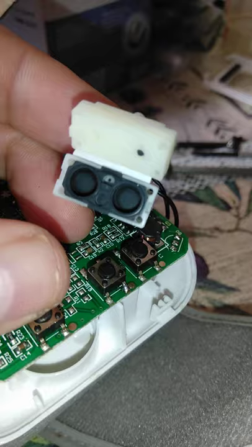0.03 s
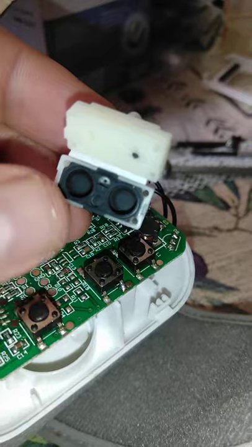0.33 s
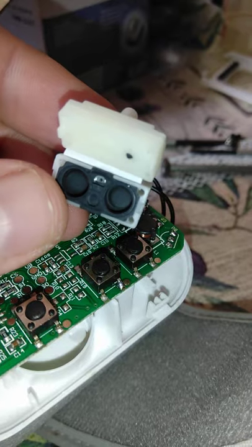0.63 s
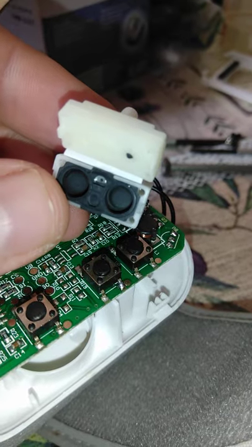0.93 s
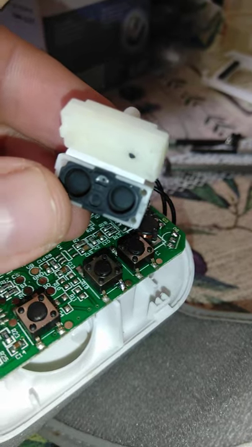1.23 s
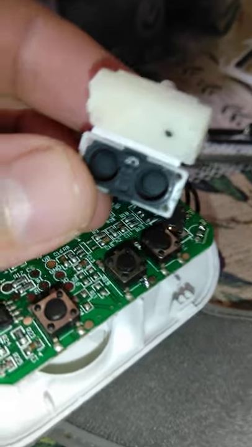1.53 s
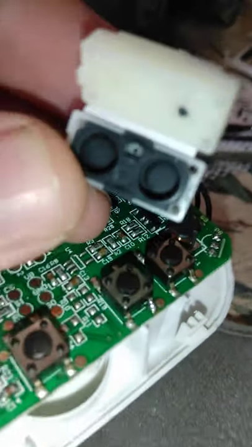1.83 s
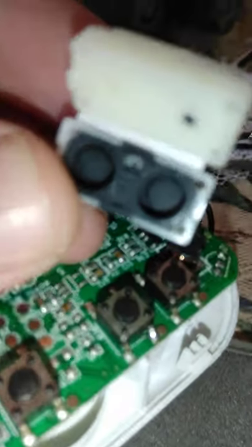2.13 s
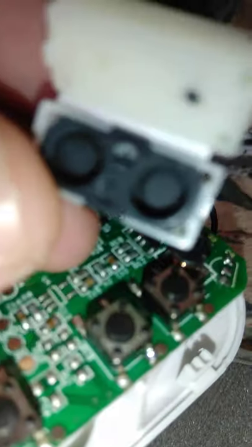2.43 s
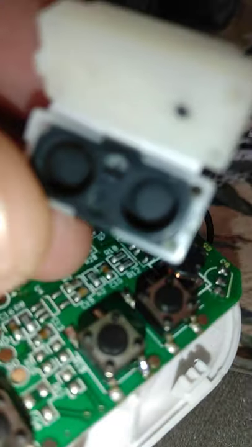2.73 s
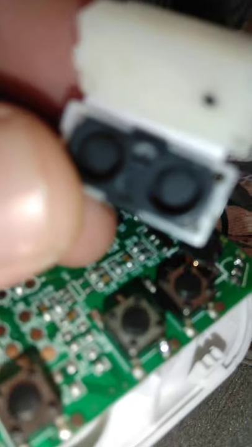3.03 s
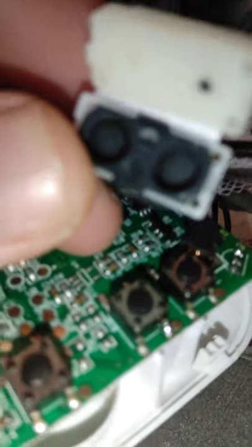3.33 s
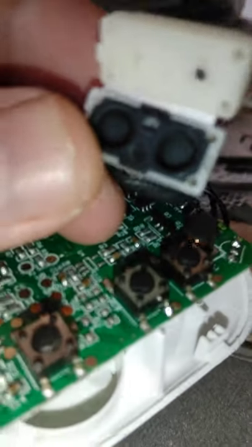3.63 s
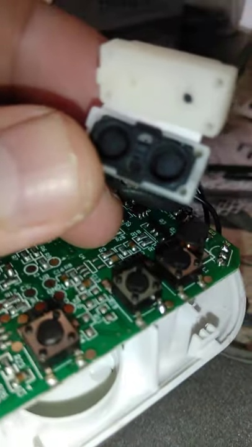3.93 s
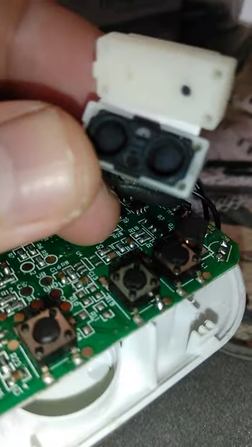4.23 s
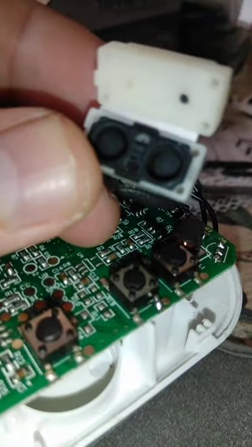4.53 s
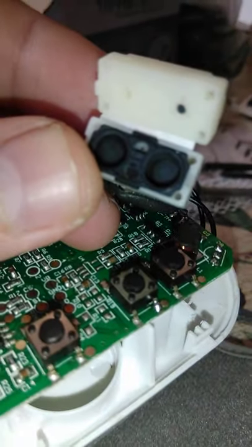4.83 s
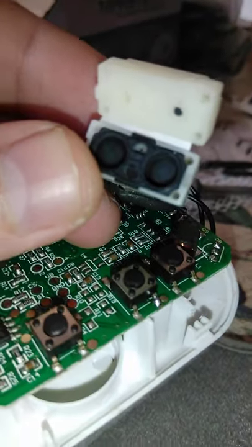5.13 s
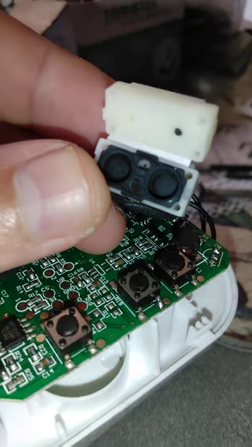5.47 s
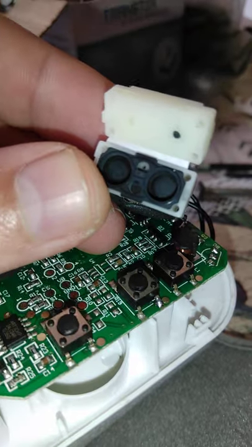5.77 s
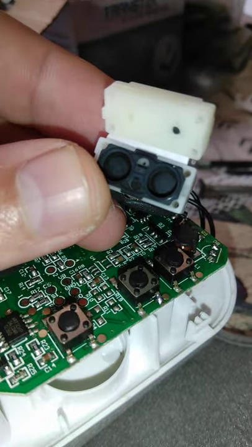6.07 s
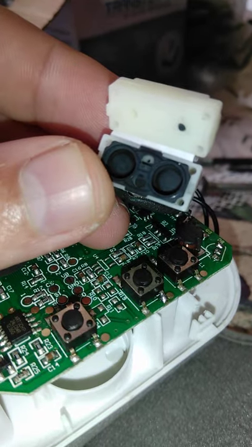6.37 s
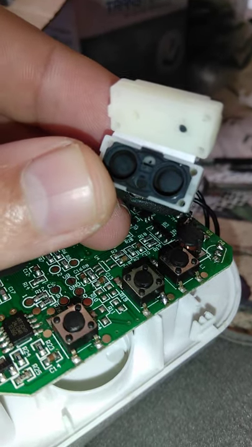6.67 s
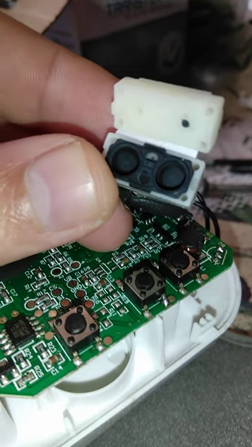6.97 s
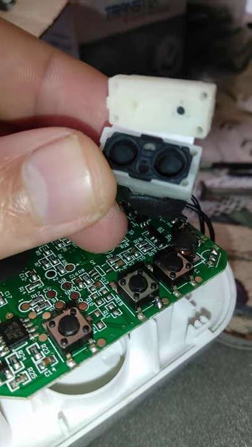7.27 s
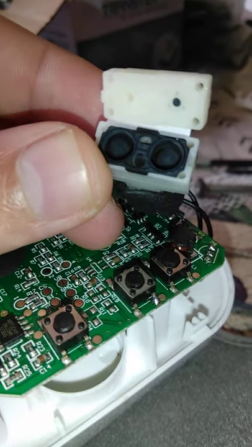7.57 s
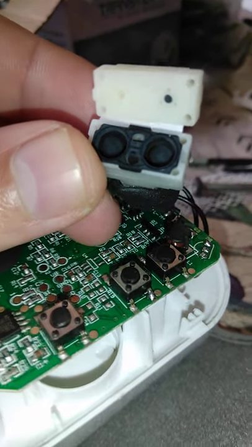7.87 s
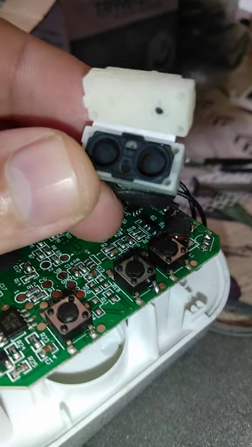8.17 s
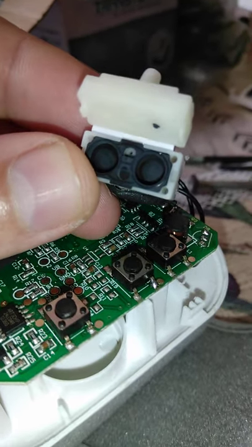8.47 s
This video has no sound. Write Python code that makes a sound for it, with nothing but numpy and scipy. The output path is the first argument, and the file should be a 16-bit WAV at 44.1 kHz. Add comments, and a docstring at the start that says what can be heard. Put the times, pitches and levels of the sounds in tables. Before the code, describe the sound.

Close up, a small air pump motor runs with a fast, raspy popping buzz and thin whirr, broken by shrill surges.

```python
"""Tiny air pump, close up

An opened pump, held in the fingers right by a two-port microphone in a quiet room. Its motor rattles
along freely, then knocks as it takes up load and drops to about half speed. From then on a rubber cup
throbs and pops once a turn over the whirr of the drive; now and then it tightens, loud and shrill."""
import sys
import numpy as np
from scipy import signal
from scipy.fft import rfft, irfft, next_fast_len
from scipy.io import wavfile
from scipy.ndimage import map_coordinates

SR = 44100
rng = np.random.default_rng(int(sys.argv[2]) if len(sys.argv) > 2 else 0)


def to_wav(sig):
    """Store sig (one row per channel, or 1-D mono) as 16-bit WAV at the path in sys.argv[1].

    Samples outside -1..1 are clipped; the rate is SR.
    """
    pcm = np.clip(np.atleast_2d(sig), -1, 1) * 32767
    pcm = np.round(pcm).astype(np.int16)
    wavfile.write(sys.argv[1], SR, pcm.T)  # frames by channels


N = 379260
TIME = np.arange(N) / SR
FREE_HZ, LOADED_HZ, CRUISE_HZ = 198, 99.5, 114.5  # shaft speeds, turns a second
LOAD_AT_S, CATCH_AT_S = .185, .553  # the load comes on; the cup catches and starts to pop
LEFT_LAG_MS = 0.25  # the left port is the farther one

# Colour of one pop. Each row: frequency in Hz, slack level in dB, tight level in dB.
POP_COLOUR = [(750, -4.5, -27), (890, -12, -27), (1220, -9.5, -15), (1410, -8.5, -13), (1656, -1, -27.5),
              (2300, 2, -2), (2550, 0.5, -7.5), (2880, 6.5, -17), (3258, 6.5, -4.5), (3750, -7, 9),
              (4150, -7.5, 5.5), (4610, -5, 17.5), (5320, -1.5, 10.5), (5850, -9.5, -6.5), (6430, -4.5, -1),
              (8230, -12.5, -10.5), (12800, -33.5, -28)]
# Strength of the pops. Each row: time in seconds, gain in dB.
POP_LEVEL = [(.6, 0.5), (1.0, 0), (1.8, 1.2), (2.3, 5), (2.95, 6), (3.8, 3), (4.5, 3), (5.2, 3), (5.6, 1.2),
             (7.2, 1.5), (8.6, 1.5)]
# A pinched cup rings in one narrow band, a thin rasp above it. Each row: frequency in Hz, gain in dB.
PINCH_COLOUR = [(2800, -1.5), (3400, -4.5), (3900, 15), (4500, -3.5), (5500, -9), (6900, 9.5), (7400, 4),
                (8100, -3)]
# The cup tightens and slackens. Each row: start and length in seconds, peak tautness and pinch, 0-1.
TIGHTENINGS = [(0.519, 0.11, 0.78, 0), (3.302, 0.081, .16, 0.6), (4.517, 0.15, 0.39, .8),
               (4.651, 0.14, 0.57, 1), (4.798, 0.068, 0.19, .8), (4.981, 0.19, 0.53, 0.79),
               (5.618, .12, 0.27, 0.3), (5.673, 0.25, 0.69, 0.2), (5.732, .15, .95, 0),
               (5.846, 0.0953, .5, 0.2), (7.28, .172, 0.84, 0.17), (7.403, .31, 0.48, .2),
               (7.523, 0.17, 0.6, 0.43), (7.668, 0.27, 0.74, 0.33)]
# Throb of the cup. Each row: multiple of the shaft speed, levels in dB before the catch, in the first
# grip and in the second, then dB added when close, when tight and at the left port.
THROB_ORDERS = [(3, -62.5, -68, -76, 7.5, 13, -20), (4, -68.5, -59.5, -57.5, 5.5, -7.5, -12),
                (5, -63, -54.5, -57, 4.5, -17, -22), (6, -66, -59, -55, 6, -1, -3.5),
                (7, -77, -57, -55, 4.5, -13.5, -1.5), (8, -66, -62, -65.5, 0, -17, -5.5)]
# Slow wander of the motor. Each row: time in seconds, speed offset in turns a second.
SPEED_WANDER = [(.5, .41), (.62, .36), (.8, -.97), (1.4, -.88), (2, -.83), (2.5, .33), (3, .12),
                (3.4, -.39), (4.2, -.12), (4.7, -.73), (5.1, -.01), (5.4, .38), (5.8, -1.08), (6.1, -.14),
                (6.5, .54), (7.2, -.31), (7.5, -.53), (7.8, -.44), (8.1, .32), (8.6, -.38)]
# Knock of the crank. Each row: frequency in Hz, level in dB.
KNOCK_COLOUR = [(700, -10), (1500, -10.5), (3000, -5), (5500, -15), (9000, -26), (15000, -26)]
# Scrape of the return stroke. Each row: frequency in Hz, level in dB.
SCRAPE_COLOUR = [(1500, -51.5), (3000, -33), (4500, -35), (6000, -26), (8000, -35), (10000, -37.5),
                 (14000, -56)]
# Whirr of the motor. Each row: frequency in Hz, left and right levels in dB.
WHIRR_COLOUR = [(212, -62, -48.5), (467, -45.5, -50), (1300, -59.5, -52), (1800, -48, -34),
                (2500, -76, -33.5), (2900, -30.5, -34.5), (3980, -40.5, -47.5), (4900, -31.5, -30.5),
                (6300, -37.5, -36.5), (7700, -36.5, -39), (8400, -40.5, -38.5), (10140, -41, -44),
                (14500, -60, -51.5), (16200, -57, -44)]
# Rattle of the loose drive. Each row: frequency in Hz, left and right levels in dB.
RATTLE_COLOUR = [(400, -60, -41), (1130, -35, -36.5), (2110, -34, -20), (2700, -29.5, -30),
                 (3730, -35, -19.5), (5250, -25, -12.5), (5850, -37, -17.5), (6700, -16.5, -23),
                 (7730, -38, -20), (8500, -27.5, -31.5), (10100, -32, -27), (13900, -32, -30),
                 (15700, -33, -48)]
# Tones of the free-running motor. Each row: multiple of the shaft speed, relative level in dB.
FREE_TONES = [(1, -41), (2, -48.5), (3, -42.5), (4, -47), (5, -62), (6, -57), (7, -54), (8, -56), (9, -47)]
# Hum as the grip changes. Each row: time in seconds, first and second order levels in dB.
HUM_LEVELS = [(0.28, -50, -70), (0.44, -57, -67), (0.55, -50.5, -64), (0.82, -50.5, -60),
              (1.34, -52.5, -59), (1.8, -56.5, -75), (2.4, -52.5, -63), (3, -50.5, -67), (4.05, -59, -72),
              (4.4, -60, -72), (4.69, -55, -60.5), (5.4, -60.5, -72.5), (5.83, -54.5, -61),
              (6.17, -59, -73), (6.6, -57.5, -61), (7.2, -56.5, -62), (7.6, -55.5, -58), (8.5, -57, -58)]
# Soft bumps. Each row: start in seconds, relative level in dB, band frequency in Hz, decay in seconds.
BUMPS = [(0.182, -45, 210, 0.021), (.185, -55, 480, 0.11), (1.784, -59, 270.4, 0.041),
         (1.913, -50.5, 330, 0.041), (3.353, -62, 55, 0.062), (3.919, -58, 55, 0.064),
         (4.479, -61, 90, 0.14), (4.695, -61, 230.3, 0.049), (4.801, -59, 89.85, .06)]
# How near the pump is held to the right port. Each row: time in seconds, closeness 0-1.
CLOSENESS = [(0, 0), (1.4, 0), (2, 0.5), (2.5, 0.64), (3, 1), (3.5, 0.44), (4, 0.28), (4.6, 0.17),
             (5.6, 0.07), (6.3, 0.14), (8.6, 0.08)]
# Hollow between hand and microphone. Each row: time in seconds, swallowed band in Hz, its depth 0-1,
# lifted band in Hz, its lift 0-1.
HAND_HOLLOW = [(0.6, 5200, 0.12, 6150, 0.15), (0.8, 4870, 0.4, 6300, 0.33), (1.5, 4600, 0.44, 6540, 0.3),
               (2.0, 5070, 0.66, 6800, 0.66), (2.6, 5500, 0.75, 7900, 1), (3.1, 5400, 0.68, 7600, 0.65),
               (3.5, 5000, 0.4, 7060, 0.48), (4.05, 4650, 0.72, 7000, 0.41), (5.1, 4500, 0.36, 6950, 0.28),
               (5.7, 5430, 0.08, 7573, .15), (6.4, 6100, 0.1, 7900, 0.17), (7.4, 5420, 0.33, 7700, 0.18),
               (8.6, 5120, 0.4, 7495, 0.35)]
# Echoes off the circuit board and the hand. Each row: delay in milliseconds, left gain, right gain.
CLOSE_ECHOES = [(0.272, 0.044, 0.0087), (0.503, 0.019, 0.12), (0.851, 0.059, 0.06), (1.6, 0.017, 0.023),
                (2.3, 0.056, 0.029)]
# The body housing the microphone shades the left port. Each row: frequency in Hz, gain in dB.
LEFT_SHADOW = [(100, -28), (400, -15), (1100, 0.5), (1600, -17.5), (2400, -3), (3400, -13.5), (4500, -7.5),
               (6000, -22), (8000, -14.5), (13000, -3)]
# Room tone. Each row: frequency in Hz, level in dB.
ROOM_COLOUR = [(20, -43), (50, -47), (75, -41), (130, -49), (250, -49), (500, -59), (1500, -45.5),
               (15000, -49)]


def cup_pops(turns, tautness, pinch, tight_db=3, stretch=0.12, puff_s=0.0019, rasp=0.8):
    """One pop a turn with a puff of air: the tighter the cup, the louder, higher and rougher it rings."""
    times = passing_times(turns, angle=.812)
    times = times[times > CATCH_AT_S]
    quiver = 1 + 0.059 * waver(6.8, 30.1)
    taut = np.interp(times, TIME, tautness * quiver)[:, None]
    db = curve(POP_LEVEL, times).T + tight_db * (1 - (1 - taut) ** 2)  # levels off near fully tight
    taut = 0.094 + 0.906 * taut  # even a slack cup keeps some tension
    uneven, flicker = rng.standard_normal((len(times), 2)).T[:, :, None]
    hz = np.fft.rfftfreq(512, 1 / SR)
    treble = np.interp(hz, [4500, 9000], [0, 1])
    slack, tight = colour(POP_COLOUR, size=512)
    tight = np.interp(hz / (1 + stretch * (taut - 1)), hz, tight)  # resonances climb with tension
    shape_db = slack + taut * (tight - slack + .8 * flicker * treble)
    shape_db += np.interp(times, TIME, pinch)[:, None] * colour(PINCH_COLOUR, size=512)
    # the escaping air is a short burst of noise through the same resonances
    fade = np.exp(-np.arange(512) / SR / puff_s)
    air = rfft(rng.standard_normal((len(times), 512)) * fade / np.linalg.norm(fade))
    puff = .215 - .045 * taut + rasp * taut * treble
    spectra = click_spectrum(shape_db + db + .4 * uneven) * (1 + puff * air)
    return place_clicks(times, spectra) * ramp(CATCH_AT_S, 0.015)


def cup_throb(turns, taut, close, angle=0.2198, sweep=0.0613, dip_db=-7.5):
    """The cup pushes air once a turn, a soft upward chirp; tension favours the third and sixth orders."""
    regripped = ramp(3.1, 0.41)  # the fingers shift their grip
    dip = ramp(7.27, 0.022) - ramp(7.9, 0.022)  # through the last run of tightenings
    push = 0
    for order, idle_db, first_db, second_db, close_db, tight_db, left_db in THROB_ORDERS:
        grip_db = first_db + regripped * (second_db - first_db)
        working_db = grip_db + close_db * close + tight_db * np.sqrt(taut) + dip_db * dip
        db = idle_db + ramp(CATCH_AT_S, 0.091) * (working_db - idle_db)
        db += 0.9 * waver(0.96, 12, count=8)
        tone = np.sqrt(2) * np.cos(2 * np.pi * (order * (turns - angle) - sweep * order ** 2))
        push += tone * gain_of(db) * gain_of([[left_db], [0]])
    return push * ramp(LOAD_AT_S, 0.091)


def cup_tension(tighten_s=.052, slacken_share=.42):
    """How tight the cup is, from 0 (slack) to 1, and how much of that is a pinch."""
    start, length, peak, pinch = np.transpose(TIGHTENINGS)[:, :, None]
    rising = (TIME - start) / tighten_s
    falling = (start + length - TIME) / (slacken_share * length)
    swells = peak * np.sin(np.pi / 2 * np.clip(np.minimum(rising, falling), 0, 1))
    return swells.max(0), (swells * pinch).max(0)


def shaft_speed(taut, brake_s=.049, pickup_at_s=.47, pickup_s=.1824, sag_hz=3.39, inertia_s=.02):
    """The motor is braked by its load, picks up to a cruise, and sags whenever the cup tightens."""
    braking = (FREE_HZ - LOADED_HZ) * np.exp(-(since(LOAD_AT_S) / brake_s) ** 1.3)
    pickup = (CRUISE_HZ - LOADED_HZ) * (1 - np.exp(-since(pickup_at_s) / pickup_s))
    lag = np.exp(-1 / (inertia_s * SR))
    sag = sag_hz * signal.lfilter([1 - lag], [1, -lag], taut ** 2)
    flutter = 0.089 * waver(6, 39.8)
    return LOADED_HZ + braking + pickup - sag + curve(SPEED_WANDER)[0] + flutter


def crank_knocks(turns, fade_db_per_s=32):
    """Taking up load, the crank knocks once a turn in its play, ever softer until the cup catches."""
    times = passing_times(turns, angle=.8)
    times = times[(times > LOAD_AT_S) & (times < CATCH_AT_S)]
    db = colour(KNOCK_COLOUR, size=512) - fade_db_per_s * (times[:, None] - LOAD_AT_S)
    return place_clicks(times, click_spectrum(db))


def crank_scrape(turns, taut, close):
    """The working crank scrapes for a millisecond on the return stroke, and more faintly just before."""
    gate = unit_rms(swell(turns, angle=0.384, width=0.072) + 0.28 * swell(turns, angle=0.06, width=0.014))
    rubbing = gate * contacts(turns, repeat_share=.76, spiky_db=3.5, wear_s=0.709) * (TIME > CATCH_AT_S)
    return ring(rubbing, SCRAPE_COLOUR)[0] * gain_of(-5 + 2.5 * close ** 2 + 3 * taut)


def motor_whirr(turns, speed, taut, close, octave_db=12, idle_db=-9):
    """Brushes and bearings rub much alike on every turn, louder with speed and once the cup has caught."""
    rubbing = [contacts(turns, repeat_share=.72, spiky_db=5.5, wear_s=0.584) for _ in range(3)]
    db = octave_db * np.log2(speed / CRUISE_HZ) + idle_db * (TIME < CATCH_AT_S)
    db += 3.5 * close - 1.5 * taut + waver(2, 12)
    return ring(at_ports(*rubbing, shared=0.39), WHIRR_COLOUR) * gain_of(db)


def drive_rattle(turns, speed, level_db=-4, octave_db=13.5, damp_db_per_s=120, fade_db_per_s=150):
    """The loose drive chatters twice a turn until the cup catches, and sings until the load damps it."""
    rubbing = [contacts(turns, repeat_share=0.21, spiky_db=4, wear_s=0.33, count=105) for _ in range(3)]
    surge = unit_rms(gain_of(2 * (np.cos(2 * np.pi * turns) + np.cos(4 * np.pi * turns))))
    chatter = ring(surge * at_ports(*rubbing, shared=0.81), RATTLE_COLOUR)
    chatter_db = level_db + octave_db * np.log2(speed / FREE_HZ) - fade_db_per_s * since(CATCH_AT_S)
    tones = sum(gain_of(db) * np.sin(2 * np.pi * (k * turns + rng.random())) for k, db in FREE_TONES)
    tones *= gain_of(level_db - damp_db_per_s * since(LOAD_AT_S))
    return chatter * gain_of(chatter_db) + tones * gain_of([[-8], [0]])


def contacts(turns, repeat_share, spiky_db, wear_s, count=135, size=8192):
    """Rubbing contacts round the shaft: a slowly changing pattern that repeats each turn, plus grit."""
    patterns = irfft(np.exp(2j * np.pi * rng.random((20, count))), size)
    age, blend = np.divmod(TIME / wear_s + rng.random(), 1)
    angle = (turns % 1 * size).astype(int)
    old, new = (patterns[(age.astype(int) + k) % 20, angle] for k in range(2))
    repeating = old * np.cos(blend * np.pi / 2) + new * np.sin(blend * np.pi / 2)
    grit = rng.standard_normal(N) * gain_of(spiky_db * np.minimum(rng.exponential(1, N), 5))
    return np.sqrt(repeat_share) * unit_rms(repeating) + np.sqrt(1 - repeat_share) * unit_rms(grit)


def housing_hum(turns):
    """The unbalanced crank shakes the housing under load, at the shaft speed and at twice that."""
    shake = 0
    for order, db, left_db in zip((1, 2), curve(HUM_LEVELS), (-15.5, -3)):
        tone = np.sqrt(2) * np.sin(2 * np.pi * (order * turns + rng.random()))
        shake += tone * gain_of(db + 1.14 * waver(0.894, 13, count=8)) * gain_of([[left_db], [0]])
    return shake * ramp(LOAD_AT_S, 0.1)


def handling_bumps():
    """The fingers, and the drive taking load, set off dull, quickly dying rumbles in the housing."""
    bumps = np.zeros(N)
    for start, db, hz, decay_s in BUMPS:
        age = since(start) / decay_s
        rumble = unit_rms(filtered(rng.standard_normal(N), "band", [hz / 2, hz * 1.37]))
        bumps += gain_of(db) * rumble * np.minimum(age * 10, 1) * np.exp(-age ** 2)
    return bumps * gain_of([[-3], [2]])


def near_field(clicks):
    """Clicks reach the microphone directly and by close echoes, late and shaded at the left port."""
    size = next_fast_len(N + 1000)
    phase_per_ms = -2j * np.pi * np.fft.rfftfreq(size, 1 / SR) / 1000
    paths = 1 + sum(np.outer(gains, np.exp(phase_per_ms * ms)) for ms, *gains in CLOSE_ECHOES)
    paths[0] *= np.exp(phase_per_ms * LEFT_LAG_MS)
    left, right = irfft(rfft(clicks, size) * paths, size)[:, :N]
    return np.array([ring(left, LEFT_SHADOW)[0], right])


def hand_sway(ports, sway_ms=0.012):
    """The unsteady hand slowly changes the path to the left port."""
    positions = np.arange(N) + waver(0.27, 1.347, count=10) * sway_ms * SR / 1000
    return np.array([map_coordinates(ports[0], [positions], order=3), ports[1]])


def hand_hollow(ports, dip_width_hz=900, lift_width_hz=1300):
    """The gap under the moving hand swallows one gliding band and, on the right, lifts a higher one."""
    dip_hz, depth, lift_hz, lift = curve(HAND_HOLLOW)
    left, right = (port - depth * resonate(port, dip_hz * ratio, dip_width_hz * ratio)
                   for port, ratio in zip(ports, (0.99, 1)))
    return np.array([left, right + lift * resonate(right, lift_hz, lift_width_hz)])


def close_up(ports, close, left_db=-1.5):
    """Brought closer, the pump turns airier and favours the right port; the hand's hollow colours it."""
    air = 0.65 * close * filtered(ports, "band", [9000, 12500])
    return hand_hollow(ports + air) * gain_of(close * np.array([[left_db], [0]]))


def reflections(clicks, wet_db=-20, t60_s=0.052, size=8192):
    """The desk and walls return a faint, short wash, different at each port."""
    t = np.arange(size) / SR
    tail = rng.standard_normal((2, size)) * gain_of(-60 * t / t60_s) * (t > .002)
    tail /= np.linalg.norm(tail[0])
    return gain_of(wet_db) * signal.oaconvolve(clicks[None], tail, axes=1)[:, :N]


def room_tone():
    """Faint rumble and hiss, mostly shared by both ports."""
    return ring(at_ports(*rng.standard_normal((3, N)), shared=.8), ROOM_COLOUR)


def at_ports(common, left, right, shared):
    """A common sound reaches the left port late; each port also hears a share of its own."""
    late = np.interp(TIME - LEFT_LAG_MS / 1000, TIME, common)
    return np.sqrt(shared) * np.array([late, common]) + np.sqrt(1 - shared) * np.array([left, right])


def gain_of(db):
    return 10 ** (np.asarray(db) / 20)


def unit_rms(x):
    return x / np.sqrt(np.mean(x ** 2) + 1e-20)


def since(start_s):
    return np.maximum(TIME - start_s, 0)


def ramp(start_s, rise_s):
    return np.minimum(since(start_s) / rise_s, 1)


def filtered(x, kind, hz, order=2):
    return signal.sosfilt(signal.butter(order, hz, kind, fs=SR, output="sos"), x)


def waver(low_hz, high_hz, count=16):
    """A slow random wavering of rms 1."""
    rates = np.geomspace(low_hz, high_hz, count)
    return unit_rms(sum(np.sin(2 * np.pi * (hz * TIME + rng.random())) / np.sqrt(hz) for hz in rates))


def curve(rows, t=TIME):
    """Every value column of a table at the times t."""
    seconds, *columns = np.transpose(rows)
    return np.array([np.interp(t, seconds, column) for column in columns])


def colour(rows, size):
    """Every dB column of a spectrum on the bins of an FFT."""
    hz, *columns = np.transpose(rows)
    bins = np.fft.rfftfreq(size, 1 / SR)
    return np.array([np.interp(np.log(bins + 1), np.log(hz), column) for column in columns])


def click_spectrum(db):
    """Spectrum of the sharpest-starting click with this colour."""
    cepstrum = irfft(np.log(gain_of(db)))
    half = cepstrum.shape[-1] // 2
    return np.exp(rfft(cepstrum * np.r_[1, np.full(half - 1, 2), 1, np.zeros(half - 1)]))


def ring(x, rows):
    """Passes x through a body with the given colour, one output per dB column."""
    response = irfft(click_spectrum(colour(rows, size=2048)))
    return signal.oaconvolve(np.atleast_2d(x), response, axes=1)[:, :N]


def resonate(x, hz, width_hz):
    """A resonance of gain 1 that follows the curve hz."""
    carrier = np.exp(2j * np.pi * np.cumsum(hz) / SR)
    pole = np.exp(-np.pi * width_hz / SR)
    return 2 * (carrier * signal.lfilter([1 - pole], [1, -pole], x / carrier)).real


def passing_times(turns, angle):
    """The times at which the shaft passes an angle, given in turns."""
    return np.interp(np.arange(angle, turns[-1], 1), turns, TIME)


def swell(turns, angle, width):
    """A short swell as the shaft passes an angle; angle and width in turns."""
    return np.exp(-(((turns - angle + .5) % 1 - .5) / width) ** 2)


def place_clicks(times, spectra, size=512):
    """Sums short sounds, given as spectra, each at its exact time."""
    whole, fraction = np.divmod(times * SR, 1)
    clicks = irfft(spectra * np.exp(-2j * np.pi * np.fft.rfftfreq(size) * fraction[:, None]))
    samples = whole.astype(int)[:, None] + np.arange(size)
    return np.bincount(samples.ravel(), clicks.ravel(), N)[:N]


def scene():
    """The pump on its one turning shaft, the hand that holds it to the microphone, the room behind."""
    taut, pinch = cup_tension()
    close = curve(CLOSENESS)[0]
    speed = shaft_speed(taut)
    turns = .84 + np.cumsum(speed) / SR
    clicks = crank_knocks(turns) + cup_pops(turns, taut, pinch) + crank_scrape(turns, taut, close)
    clicks = filtered(clicks, "high", 950, order=5)  # such short clicks carry little bass
    direct = hand_sway(near_field(clicks)) + motor_whirr(turns, speed, taut, close)
    pump = close_up(direct, close) + reflections(clicks) + drive_rattle(turns, speed)
    return pump + housing_hum(turns) + cup_throb(turns, taut, close) + handling_bumps() + room_tone()


def record(dry, edge_hz=15750):
    """The recorder cuts off the highest treble."""
    lowpass = signal.firwin(511, edge_hz, window=("kaiser", 9), fs=SR)
    return signal.oaconvolve(dry, lowpass[None], "same")


dry = scene()
out = record(dry)
to_wav(out)
```